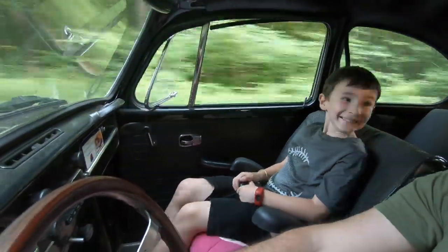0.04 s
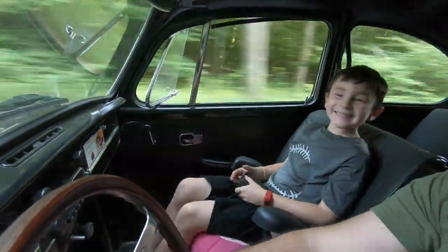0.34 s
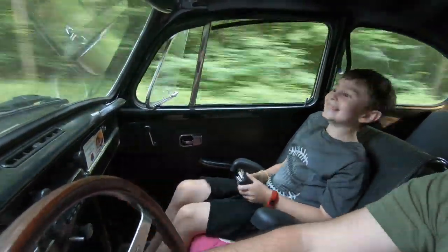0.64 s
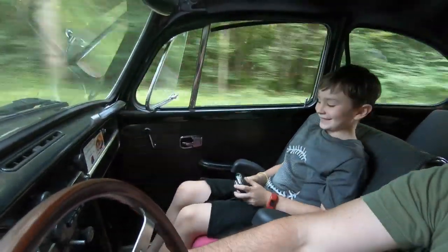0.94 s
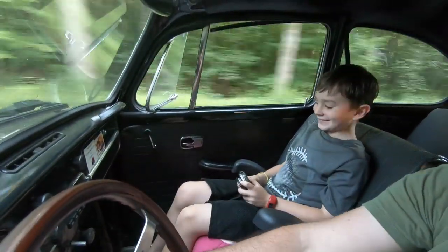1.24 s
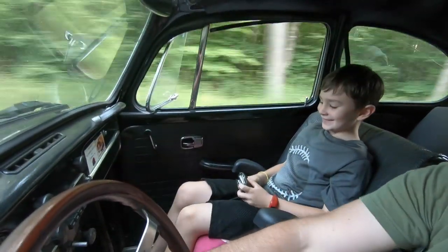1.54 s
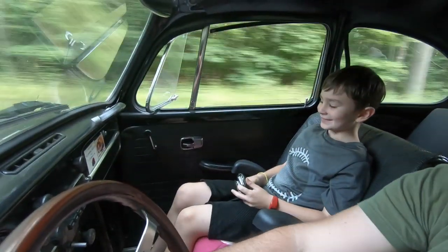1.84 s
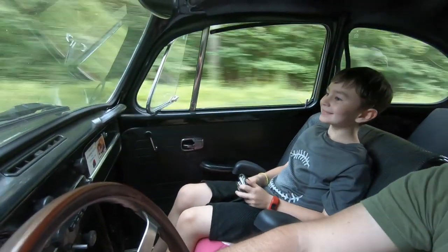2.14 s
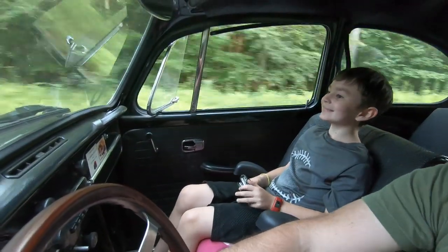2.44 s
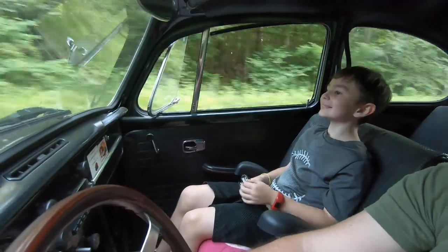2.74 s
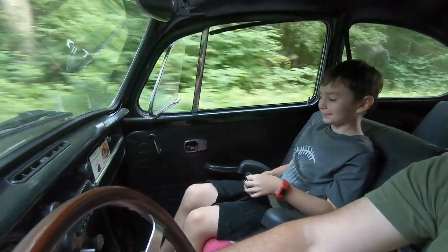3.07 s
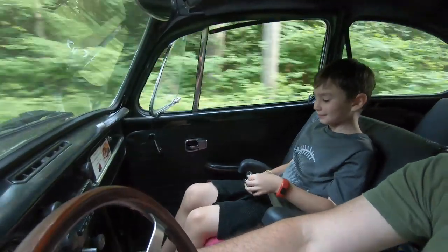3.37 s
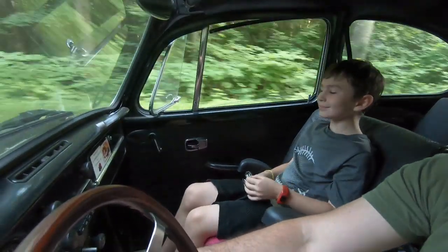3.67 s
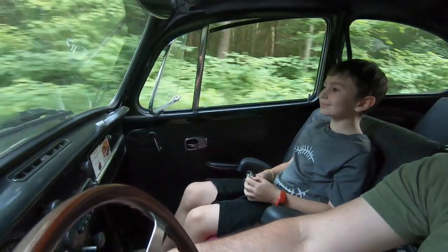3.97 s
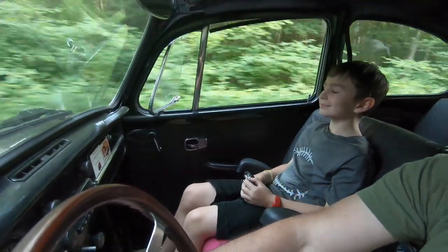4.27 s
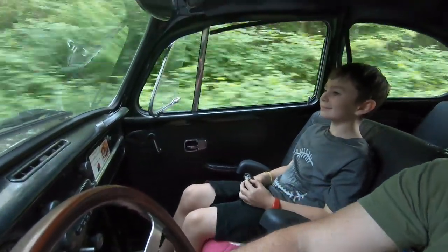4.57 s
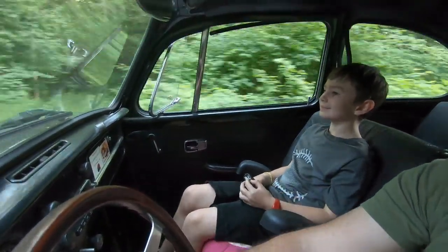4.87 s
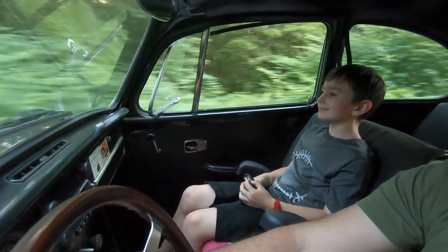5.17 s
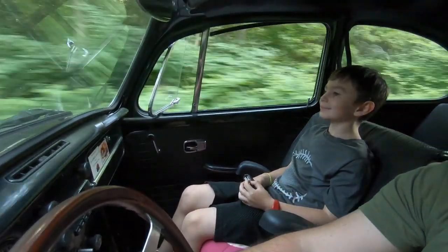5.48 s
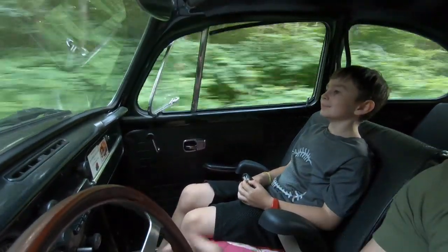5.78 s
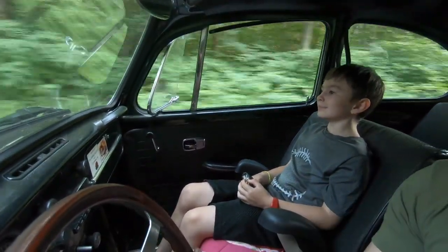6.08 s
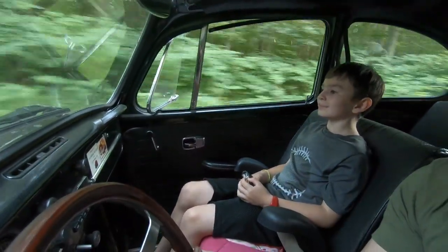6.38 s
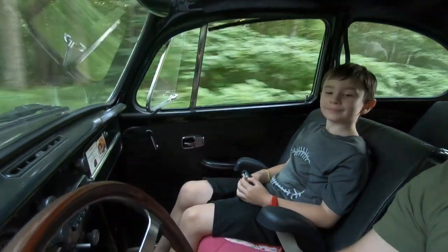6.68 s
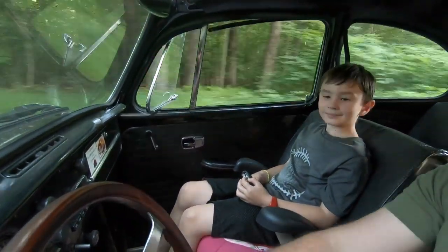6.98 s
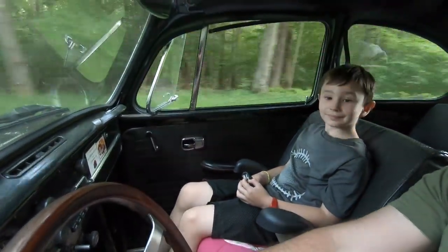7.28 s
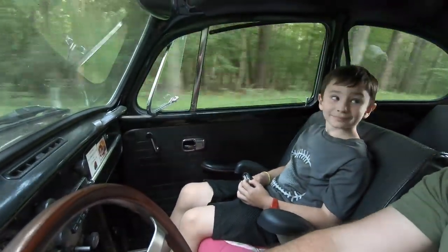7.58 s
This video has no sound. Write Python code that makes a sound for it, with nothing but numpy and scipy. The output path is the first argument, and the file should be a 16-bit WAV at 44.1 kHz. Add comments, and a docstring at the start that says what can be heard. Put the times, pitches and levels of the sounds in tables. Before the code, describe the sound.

An air-cooled car engine drones from inside the cabin, revs slowly sinking, over road rumble and wind hiss.

```python
"""An air-cooled flat-four, heard from inside a small car, sinks slowly from about 4700 to 2400 rpm.
The firing note booms, and each engine order swells and fades as it slides through the cabin's resonances.
Fan and gears hum along and the valve gear clatters, over suspension rumble, tyre roar and wind hiss
at the windows. A loose metal part jingles at the very start; glass and steel throw the treble back."""
import sys
import numpy as np
from scipy import signal
from scipy.fft import rfft, irfft, next_fast_len
from scipy.io import wavfile

SR = 44100
rng = np.random.default_rng(int(sys.argv[2]) if len(sys.argv) > 2 else 0)


def master_out(mix):
    """Clip the mix to full scale and print it as 16-bit PCM to the path in sys.argv[1]."""
    frames = np.transpose(np.atleast_2d(mix))
    ceiling = np.clip(frames, -1, 1)
    pcm = np.round(ceiling * 32767).astype(np.int16)
    wavfile.write(sys.argv[1], SR, pcm)


N = 335853
TIME = np.arange(N) / SR
HOP = 64  # samples between updates of an order's level

# crankshaft speed, winding down (time [s], speed [turns/s])
CRANK_SPEED = [(0.0, 79.15), (0.5, 75.75), (1.0, 72.22), (1.5, 68.6), (2.0, 65.0), (2.5, 61.15),
               (3.0, 57.65), (3.5, 54.85), (4.0, 52.35), (4.5, 50.0), (5.0, 47.65), (5.5, 45.5),
               (6.0, 43.9), (6.5, 42.6), (7.0, 41.35), (7.62, 39.9)]
# how hard the engine works; drone, roar, clatter and hiss ride on it (time [s], level [dB])
ENGINE_LOAD = [(0.0, 3.5), (0.5, 4), (1.2, 4.7), (2.1, 4.5), (2.9, 1.74), (3.6, 1.5), (4.1, 1.8),
               (4.55, -2.0), (4.95, -1.5), (5.7, -5.5), (6.1, -6), (6.8, -2.5), (7.2, -1.5), (7.62, -2)]
# orders that shake the shell; 2 is the firing note, 1.685 the fan (order [x crank speed], level [dB])
BOOM_ORDERS = [(1.0, -12.5), (1.5, -15), (1.685, -9.5), (2.0, 0.5), (2.5, -22.5), (3.0, -12), (3.499, -24),
               (4.0, -23.5)]
# booming modes of the body shell and the air in it (pitch [Hz], width [Hz], level [dB])
SHELL_MODES = [(50, 25, -20), (68.6, 21, -16), (79.9, 2.9, -21), (92.2, 10.1, -14), (101.7, 3.6, -15.5),
               (117.9, 11.4, -19), (133.1, 10.8, -19.5), (170.3, 23, -18.5), (212, 21, -12),
               (236, 18.3, -5.5), (253.8, 13, -1.5), (295.8, 26, 6), (319.8, 25, 11)]
# dead spots between modes, where the boom cancels at the seats (pitch [Hz], width [Hz], gain [dB])
SHELL_NULLS = [(85.84, 1.0, -14), (150.6, 1.8, -6)]
# the drone's partials; half orders come from unequal cylinders (order [x crank speed], level [dB])
DRONE_ORDERS = [(4.5, 2.5), (5.0, 1.5), (5.5, 0.5), (6.0, 3), (6.5, 5.5), (7.0, -3.5), (7.5, -10.5),
                (8.0, 7), (8.5, 5), (9.0, -5.5), (9.5, 5.2), (10.0, 3.5), (10.5, 4.5), (11.0, 0),
                (11.5, -8), (12.0, -2.2), (12.5, -5), (13.0, 1.5), (13.5, 7), (14.0, -8), (14.5, 6.5),
                (15.0, 4.5), (15.5, -11), (16.0, -2), (16.5, 10), (17.0, -2.5), (17.5, -10.5), (18.0, 7.5),
                (18.5, 10)]
# hum of the belt-driven fan and the gear mesh (order [x crank speed], level [dB])
FAN_GEAR_ORDERS = [(3.68, 0), (5.405, 0), (10.81, -8.5)]
# peaks and valleys of the path from engine bay to seats (frequency [Hz], gain [dB])
CABIN_RESPONSE = [(180, -43.5), (240, -41), (310, -49.5), (400, -43), (490, -57.5), (570, -48.5),
                  (660, -61), (760, -45.5), (830, -59.5), (910, -79.5), (1400, -68)]
# panels that sing when an order slides through their pitch (pitch [Hz], width [Hz], boost [dB])
PANEL_MODES = [(318.5, 12, 10.5), (437.4, 7, 6), (519, 5.3, 4), (562, 5.9, 6), (598, 14, 9.5),
               (663, 9, 13.5), (718, 9, 4)]
# one order sings out for a while (start [s], end [s], order [x crank speed], boost [dB])
ORDER_SWELLS = [(1.08, 1.644, 10, 13), (1.09, 1.82, 10.5, 7), (1.38, 2.42, 6, 11), (2.2, 2.85, 12, 7),
                (2.3, 3.2, 12.5, 11.5), (3.21, 3.81, 9.5, 7.5), (3.7, 4.75, 14.5, 4), (4.7, 5.35, 16, 9.5),
                (5.0, 5.6, 8, 6), (5.39, 6.737, 5.405, 9), (6.38, 7.27, 13.5, 8.5), (6.66, 7.7, 10.81, 21)]
# suspension rumble, easing where the road gets smoother (time [s], level [dB])
RUMBLE_LEVEL = [(0.0, -26), (0.8, -27), (2.2, -22.5), (2.8, -27), (3.3, -21), (4.3, -23.5), (5.9, -25.5),
                (6.7, -33.5), (7.62, -31)]
# deep colour of the suspension rumble (frequency [Hz], level [dB])
RUMBLE_COLOUR = [(8, -30.5), (16, -13), (24, -1), (32, 5.5), (40, 0.5), (50, -4), (72, -2.5), (100, -3),
                 (150, -8.5), (200, -21.5), (400, -72.5)]
# low-mid colour of the tyres through the floor (frequency [Hz], level [dB])
ROAR_COLOUR = [(90, -36), (155, 1.5), (205, -4.5), (232, 3), (280, 0), (315, -2), (345, -3), (420, -2),
               (495, -9), (570, -4), (660, -10), (760, -8.5), (870, -20.5), (1300, -43.5), (3000, -85.5)]
# midrange bite of the valve gear (frequency [Hz], level [dB])
CLATTER_COLOUR = [(500, -24.5), (880, -13.5), (1000, -4.5), (1250, -0.5), (1345, 0), (1400, 6.5),
                  (1460, -1), (1780, 0), (1950, -8), (2300, -21), (3500, -45.5), (8000, -79.5)]
# thin upper edge of the valve gear (frequency [Hz], level [dB])
WHINE_COLOUR = [(1500, -25), (2100, -2.5), (2550, -4), (3000, -2), (3800, -0.5), (5000, -4), (7000, -24)]
# airy colour of the wind at the window seals (frequency [Hz], level [dB])
HISS_COLOUR = [(900, -29.5), (2000, -1.5), (2550, -3), (2900, 1), (3600, -2), (5000, -2.5), (6100, -4),
               (7100, -10), (7700, -16.5), (9000, -24.5), (10200, -35), (11600, -47), (12700, -34.5),
               (15700, -41.5)]
# touches of a small loose metal part (time [s], level [dB])
JINGLE_HITS = [(.025, -27), (.035, -26), (.048, -29), (0.081, -34)]

ROAR_PER_LOAD, CLATTER_PER_LOAD, TOP_PER_LOAD = 0.84, 1.15, 1.16  # dB gained per dB of load


def gain_of(db):
    """Decibels to amplitude."""
    return 10 ** (np.asarray(db) / 20)


def unit_rms(x):
    """Scales to rms 1."""
    return x / np.sqrt(np.mean(x ** 2) + 1e-20)


def follow(curve):
    """A curve's value at each sample."""
    return np.interp(TIME, *np.transpose(curve))


def level_at(spectrum, hz):
    """A spectrum's level in dB, interpolated on a log-frequency axis."""
    corner_hz, db = np.transpose(spectrum)
    return np.interp(np.log(hz + 1), np.log(corner_hz + 1), db)


def bells(peaks, hz):
    """Bell-shaped boosts or cuts, in dB, at the given pitches."""
    return sum(db * np.exp(-.5 * ((hz - centre) / width) ** 2) for centre, width, db in peaks)


def wander(rate_hz, points=4096):
    """A random drift of rms 1 that rolls off above rate_hz."""
    hz = np.fft.rfftfreq(points, TIME[-1] / points)
    drift = irfft(rfft(rng.standard_normal(points)) / (1 + (hz / rate_hz) ** 2))
    return np.interp(TIME, np.linspace(0, TIME[-1], points), unit_rms(drift))


def coloured(x, colour):
    """Filters x with a colour curve and scales it to rms 1."""
    size = next_fast_len(N)
    shape = gain_of(level_at(colour, np.fft.rfftfreq(size, 1 / SR)))
    return unit_rms(irfft(rfft(x, size) * shape, size)[:N])


def noise(colour):
    """Noise of rms 1 in the given colour."""
    return coloured(rng.standard_normal(N), colour)


def tone(turns):
    """A sine of rms 1 that starts anywhere in its cycle."""
    return np.sqrt(2) * np.sin(2 * np.pi * (turns + rng.random()))


def shell_response(hz):
    """How loudly the body shell answers at each pitch, in dB: its modes add in power."""
    power = sum(gain_of(db) ** 2 / (1 + (2 * (hz - centre) / width) ** 2) ** 2
                for centre, width, db in SHELL_MODES)
    return 10 * np.log10(power) + bells(SHELL_NULLS, hz)


def body_boom(speed, turns, boom_db=-0.8, shake=0.036, drift_db=0.35):
    """Each low order swells and fades as the sinking revs carry it through the modes of the shell."""
    out = np.zeros(N)
    for order, db in BOOM_ORDERS:
        level_db = np.interp(TIME, TIME[::HOP], db + shell_response(order * speed[::HOP]))
        level_db += drift_db * wander(rate_hz=2.4)
        out += gain_of(level_db) * tone(order * turns) * (1 + shake * wander(rate_hz=38))
    return gain_of(boom_db) * out


def engine_drone(speed, turns, load_db, roughness=.09, scatter_turns=.14, swell_ramp_s=0.15):
    """Engine, fan and gear orders glide through the cabin's resonances; no two cycles are equally strong."""
    orders, order_db = np.transpose(DRONE_ORDERS + FAN_GEAR_ORDERS)
    step_times = TIME[::HOP]
    hz = orders[:, None] * speed[::HOP]
    level_db = order_db[:, None] + level_at(CABIN_RESPONSE, hz) + bells(PANEL_MODES, hz)
    for start, end, order, boost_db in ORDER_SWELLS:
        inside_s = np.minimum(step_times - start, end - step_times)
        swell = np.clip(inside_s / swell_ramp_s + .5, 0, 1)
        level_db[np.argmin(abs(orders - order))] += boost_db * swell
    # one cylinder barks loudest: neighbouring high orders stay nearly in step and throb once a cycle
    scatter = np.where(orders > 9, scatter_turns, 1)
    lags = np.cumsum(scatter * rng.standard_normal(len(orders)))
    out = np.zeros(N)
    for order, envelope, lag in zip(orders, gain_of(level_db), lags):
        partial = np.sqrt(2) * np.cos(2 * np.pi * (order * turns - lag))
        out += np.interp(TIME, step_times, envelope) * partial * (1 + roughness * wander(rate_hz=29))
    return gain_of(load_db) * out


def road_noise(load_db, roar_db=-28, rumble_sway_db=.7, roar_sway_db=1.5):
    """The suspension rumbles and the tyres roar through the floor; both sway with the road surface."""
    rumble_gain = gain_of(follow(RUMBLE_LEVEL) + rumble_sway_db * wander(rate_hz=3.2))
    roar_gain = gain_of(roar_db + ROAR_PER_LOAD * load_db + roar_sway_db * wander(rate_hz=4.0))
    return rumble_gain * noise(RUMBLE_COLOUR) + roar_gain * noise(ROAR_COLOUR)


def valve_ticks(turns, harmonics=170, size=8192):
    """One pattern of ticks, looped every two crank turns: a dense comb of high orders."""
    spectrum = rng.standard_normal(harmonics) * np.exp(2j * np.pi * rng.random(harmonics))
    cycle_position = turns / 2 % 1
    return np.interp(cycle_position * size, np.arange(size), irfft(spectrum, size))


def valve_gear(turns, load_db, clatter_db=-41.0, whirr_db=-43.5, whine_db=-53, throb_depth=0.058):
    """The valve gear clatters and whirrs in time with the engine cycle, with a thin whine on top."""
    ticks = valve_ticks(turns)
    throb = 1 + throb_depth * unit_rms(sum(tone(k * turns / 2) for k in range(1, 5)))
    clatter = gain_of(clatter_db) * throb * noise(CLATTER_COLOUR)
    whirr = gain_of(whirr_db) * coloured(ticks, CLATTER_COLOUR)
    whine = gain_of(whine_db + TOP_PER_LOAD * load_db) * coloured(ticks, WHINE_COLOUR)
    return gain_of(CLATTER_PER_LOAD * load_db) * (clatter + whirr) + whine


def window_wind(load_db, hiss_db=-45.0, flutter_db=0.63):
    """Wind hisses and flutters at the window seals."""
    level_db = hiss_db + TOP_PER_LOAD * load_db + flutter_db * wander(rate_hz=25)
    return gain_of(level_db) * noise(HISS_COLOUR)


def metal_jingle(ring_hz=5250, t60_s=0.023):
    """Each touch of the loose part rings one short, high mode."""
    out = np.zeros(N)
    for start, db in JINGLE_HITS:
        age = np.maximum(TIME - start, 0)
        decay_db = -60 * np.minimum(age / t60_s, 10)
        out += gain_of(db + decay_db) * np.sin(2 * np.pi * ring_hz * age)
    return out


def cabin_reflections(x, wet_db=-14, t60_s=0.033, predelay_s=.002, size=2600):
    """Glass and painted steel throw the treble back within a few hundredths of a second."""
    age = np.arange(size) / SR
    tail = rng.standard_normal(size) * gain_of(-60 * age / t60_s) * (age > predelay_s)
    return x + gain_of(wet_db) * signal.oaconvolve(x, tail / np.linalg.norm(tail))[:N]


def scene(speed_wobble=0.00039):
    """One slightly unsteady crankshaft drives every engine layer, over a bed of road and wind."""
    speed, load_db = follow(CRANK_SPEED), follow(ENGINE_LOAD)
    turns = np.cumsum(speed * (1 + speed_wobble * wander(rate_hz=6.6))) / SR
    treble = valve_gear(turns, load_db) + window_wind(load_db) + metal_jingle()
    treble = cabin_reflections(treble)
    body = body_boom(speed, turns) + engine_drone(speed, turns, load_db) + road_noise(load_db)
    return (body + treble)[None]


def record(dry, cutoff_hz=15700):
    """Tiny fades at both ends and a steep high cut."""
    faded = dry * signal.windows.tukey(N, .001)
    return signal.sosfiltfilt(signal.butter(16, cutoff_hz, fs=SR, output="sos"), faded)


dry = scene()
out = record(dry)
master_out(out)
```